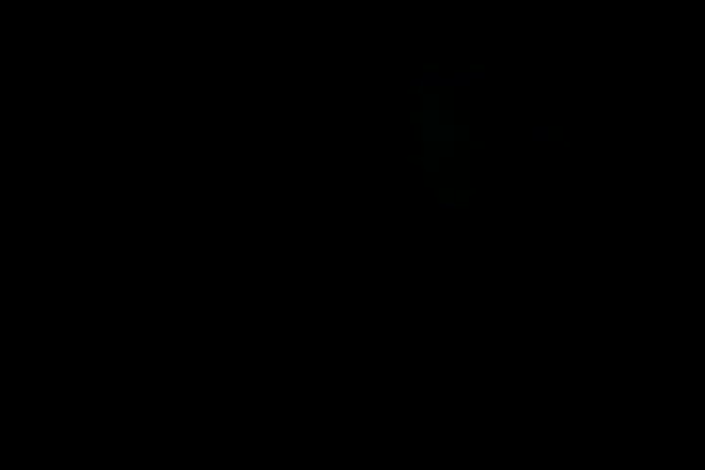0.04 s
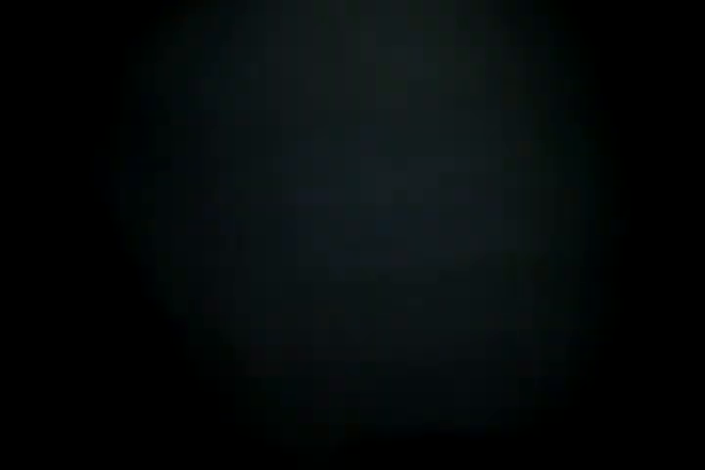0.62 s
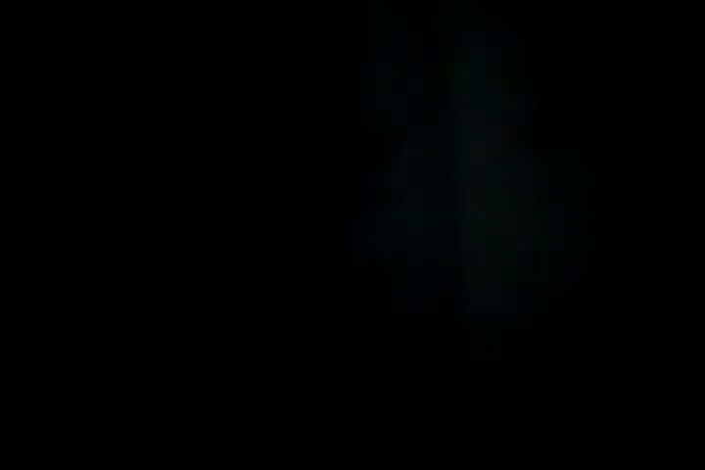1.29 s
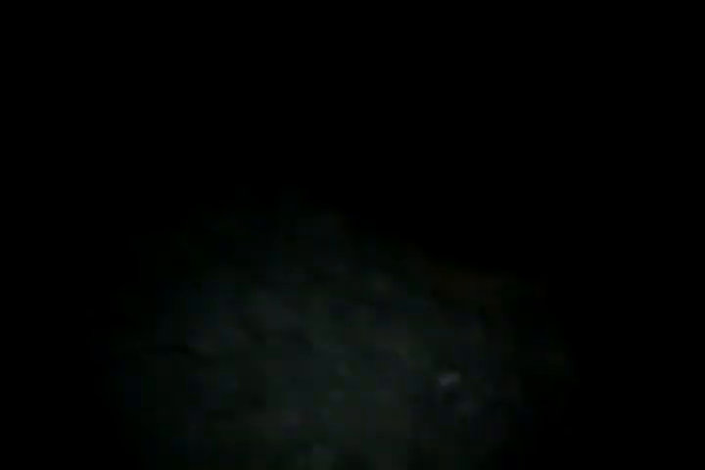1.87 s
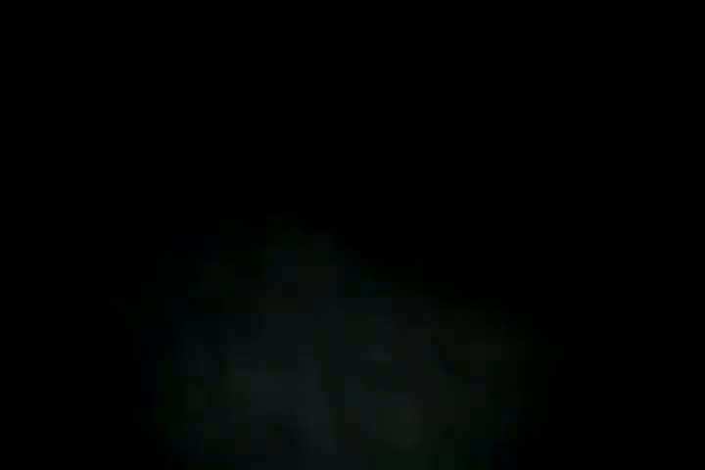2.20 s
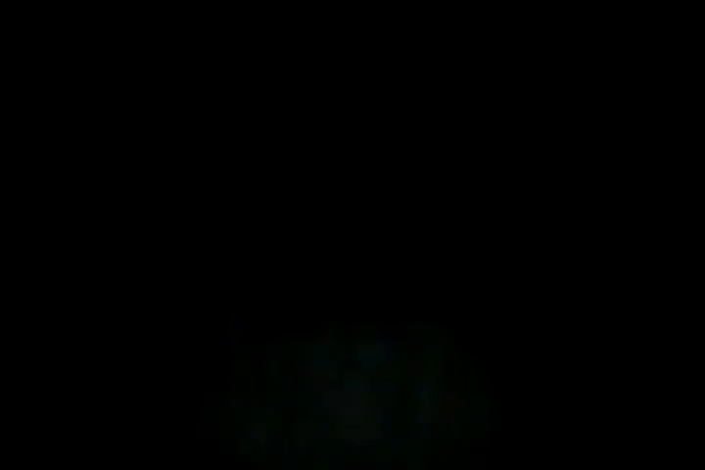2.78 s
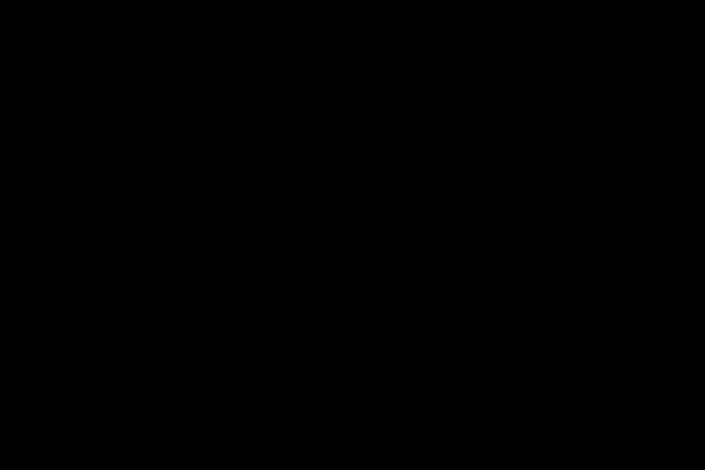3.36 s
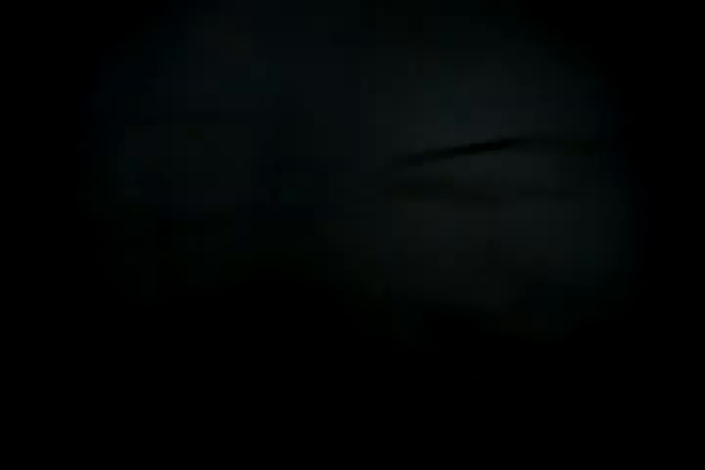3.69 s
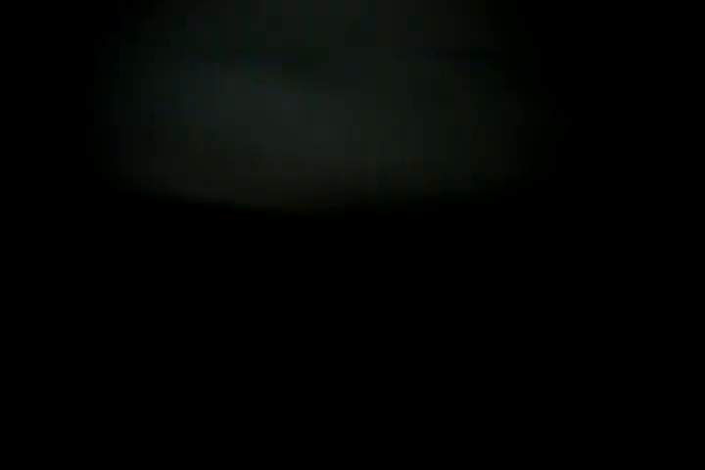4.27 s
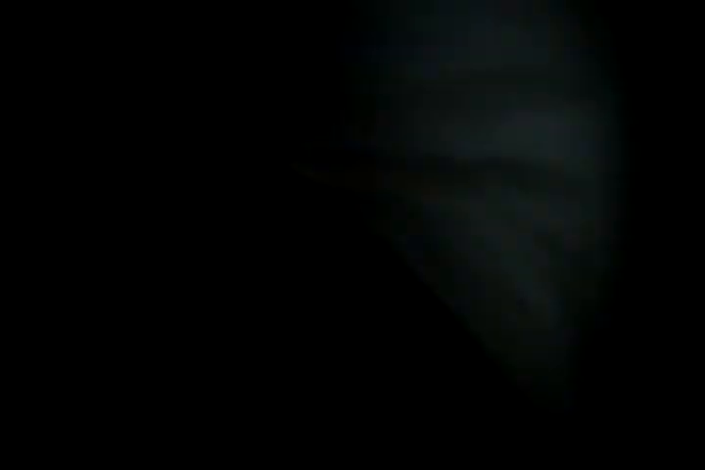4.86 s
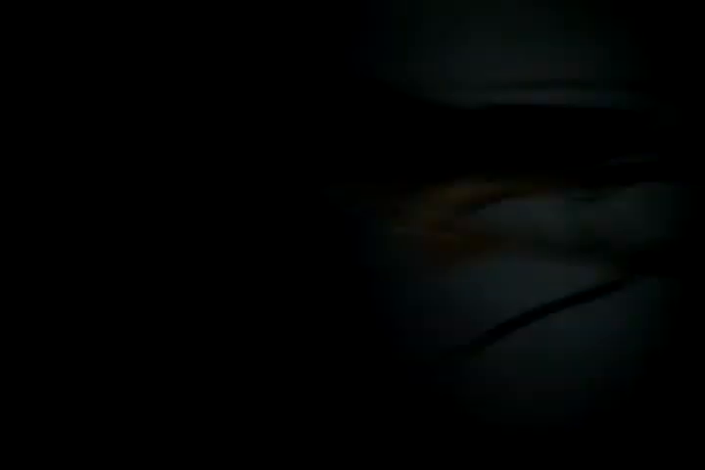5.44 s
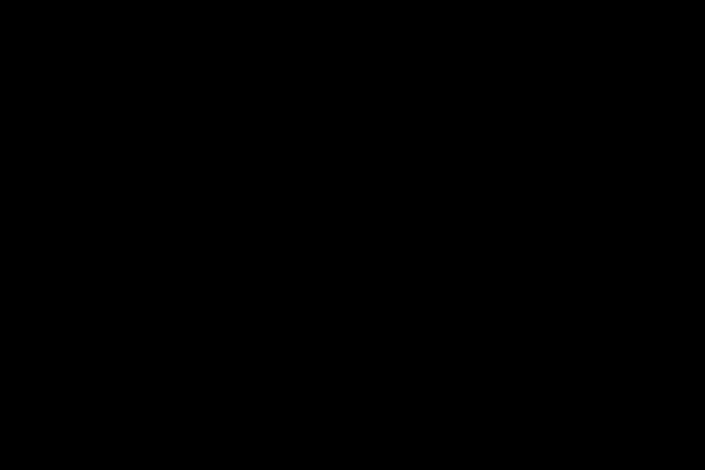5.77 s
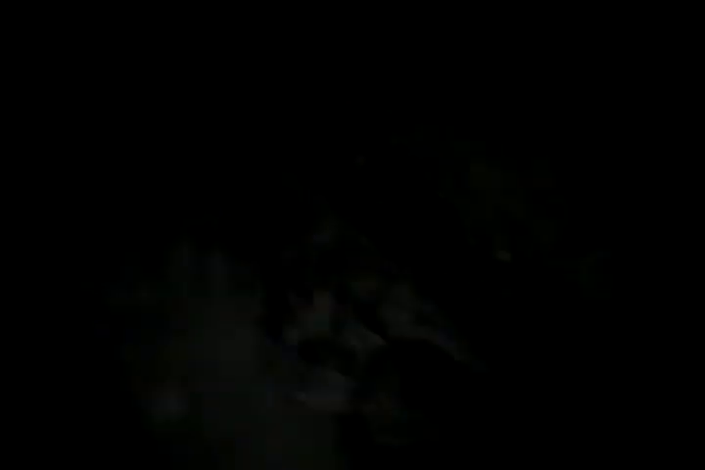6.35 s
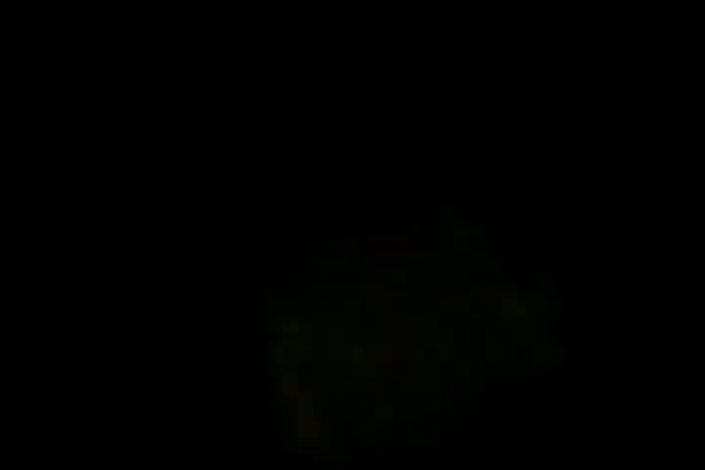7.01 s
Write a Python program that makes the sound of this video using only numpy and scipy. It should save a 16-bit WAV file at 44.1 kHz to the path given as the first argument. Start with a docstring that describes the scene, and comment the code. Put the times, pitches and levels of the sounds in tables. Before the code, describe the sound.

Slow, uneven footsteps crunch over rubble in a small concrete bunker, with cracking stones, scuffs and clinking shards.

```python
"""Slow steps over rubble in a small concrete bunker, heard by a hand-held camera.
Over a faint hiss, clothes rustle and the first light steps grind on grit. Within a second a stone
cracks, the hand bumps the camera, a sole scuffs and a loose shard clinks. From 2 to 3.5 seconds the
steps are heavy and many stones snap. Near 6 seconds come the loudest clink, the hardest bump and more
heavy steps, then the feet ease off. All along, the close walls answer with a short echo."""
import sys
import numpy as np
from scipy import signal
from scipy.fft import rfft, irfft, next_fast_len
from scipy.io import wavfile
from scipy.ndimage import map_coordinates

SR = 44100
rng = np.random.default_rng(int(sys.argv[2]) if len(sys.argv) > 2 else 0)


def digitize_waveform(pressure):
    """Quantize a signal to 16-bit integers and store it at the path in sys.argv[1].

    Rows of a 2-D input are taken as channels; values are limited to [-1, 1].
    """
    field = np.atleast_2d(pressure).T
    bounded = np.clip(field, -1, 1)
    quanta = np.round(bounded * 32767).astype(np.int16)
    wavfile.write(sys.argv[1], SR, quanta)


N = 318887


def amp(db):
    """Turn decibels into a number to multiply by."""
    return 10 ** (np.asarray(db) / 20)


def unit(x):
    """Scale x to an average (rms) level of 1."""
    return x / np.sqrt(np.mean(x ** 2) + 1e-20)


def along(points, hz):
    """Read between (Hz, value) points on a log frequency scale."""
    point_hz, values = np.transpose(points)
    return np.interp(np.log(hz + 1), np.log(point_hz + 1), values)


def add(track, start_s, sound):
    """Mix a sound into the track."""
    start = int(np.clip(round(start_s * SR), 0, N))
    track[start:start + len(sound)] += sound[:N - start]


def wobble(rate):
    """A smooth curve through `rate` random values a second."""
    return map_coordinates(rng.standard_normal(int(N * rate / SR) + 4), [np.arange(N) * rate / SR])


def coloured(x, gain_db):
    """Filter x by gain_db, a function that gives dB for each frequency."""
    size = 2 * next_fast_len(len(x) // 2 + 2048)
    cepstrum = irfft(np.log(amp(gain_db(np.fft.rfftfreq(size, 1 / SR))) + 1e-6), size)
    # make the filter ring after a click, never before it
    cepstrum[1:size // 2] *= 2
    cepstrum[size // 2 + 1:] = 0
    return irfft(rfft(x, size) * np.exp(rfft(cepstrum)), size)[:len(x)]


def shaped(x, tone):
    """Filter x by a table of (Hz, dB) points."""
    return coloured(x, lambda hz: along(tone, hz))


def hump(hz, centre_hz, width_hz):
    """Gain in dB of one broad resonance."""
    return -10 * np.log10(1 + (2 * (hz - centre_hz) / width_hz) ** 2)


def grains(length, rate, spread_db, rub):
    """Tiny breaks of uneven size, about `rate` a second, over smooth rubbing noise."""
    chance = rng.random(length)
    size, push, smooth = rng.standard_normal((3, length))
    clicks = (chance < rate / SR) * np.sign(push) * amp(spread_db * np.minimum(size, 2.5))
    return unit(unit(clicks) + rub * smooth)


# The tone of the hiss. Each row: frequency in Hz, gain in dB.
HISS_TONE = [(25, -4), (60, -6), (95, -28), (150, -24), (215, 1), (350, 2), (900, -2), (2500, -7),
             (5000, -9), (6800, -3), (7500, -7)]
def hiss():
    """The microphone's own faint, steady noise."""
    return amp(-55) * unit(shaped(rng.standard_normal(N), HISS_TONE))


# How the rustle rises and falls. Each row: time in seconds, relative level in dB.
RUSTLE_LEVELS = [(0.0, -61), (0.04, -82), (1.65, -64.5), (1.81, -50.5), (2.35, -50.5), (2.58, -52.5),
                 (3.14, -51.5), (3.56, -41), (3.79, -57), (3.9, -46.5), (5.84, -55), (6.24, -44.5),
                 (6.99, -59), (7.23, -54.5)]
# The tone of cloth. Each row: frequency in Hz, gain in dB.
CLOTH_TONE = [(30, -2.5), (65, -6), (100, -20), (150, -1.5), (270, -2), (450, -6), (800, -10.5),
              (3000, -39.5)]
def clothes():
    """Clothes rub with a low, uneven rustle."""
    level_db = np.interp(np.arange(N) / SR, *np.transpose(RUSTLE_LEVELS)) + 4.1 * wobble(14)
    rustle = unit(shaped(grains(N, rate=400, spread_db=1.5, rub=0.77), CLOTH_TONE))
    return rustle * amp(level_db - 2.5)


def pebbles(rate, pitch_hz, spread, t60, spread_db):
    """Small stones tap at random, each at its own pitch; t60 is the seconds to fade by 60 dB."""
    when, size, detune = rng.random((int(rate * N / SR), 3)).T[:, :, None]
    t = np.arange(SR // 80) / SR
    hz = pitch_hz * np.exp(spread * (2 * detune - 1))
    taps = amp(-spread_db * np.log(0.023 + size) - 60 * t / t60) * np.sin(2 * np.pi * hz * t)
    positions = (when * N).astype(int) + np.arange(len(t))
    return unit(np.bincount(positions.ravel(), taps.ravel(), N)[:N])


# The tones of grinding rubble and of its hollow ring. Each row: frequency in Hz, gain in dB.
GRIND_TONE = [(100, -43.5), (200, -7), (400, -2), (600, -0.5), (900, -2), (1250, 0.5), (1650, 0),
              (2050, -5), (2800, -5), (4500, -12.5), (7500, -32.5)]
HOLLOW_TONE = [(300, -38), (900, -16.5), (1300, -5.5), (1600, -2.5), (1850, -7), (2200, -11.5), (4000, -40)]
def grinding(breaks, coarse):
    """The low part of a step: rubble rubs and knocks, and rings hollow where it is coarse."""
    rubble = unit(shaped(breaks + grains(N, rate=1200, spread_db=3.5, rub=0.97), GRIND_TONE))
    knocks = pebbles(rate=150, pitch_hz=956, spread=0.8, t60=0.036, spread_db=4.0)
    hollow = unit(shaped(grains(N, rate=1200, spread_db=11.5, rub=0.65), HOLLOW_TONE))
    return unit(rubble + 0.5 * knocks + 0.81 * coarse * hollow)


# The tones of coarse gravel and fine sand. Each row: frequency in Hz, gain in dB.
GRAVEL_TONE = [(150, -54), (1500, -29), (2800, -15), (3800, -7), (4700, -7), (5400, -5.5), (6000, -0.5),
               (6900, -12.5), (7600, -24)]
SAND_TONE = [(150, -65.5), (1500, -26), (2800, -17.5), (3800, -12), (4700, -13), (5800, -6), (6600, 3.5),
             (7100, -6.5), (7600, -15)]
def grit(breaks, coarse):
    """The high part of a step: gravel and sand crackle while tiny stones tick."""
    gravel = unit(shaped(breaks + grains(N, rate=3800, spread_db=5.0, rub=0.18), GRAVEL_TONE))
    sand = unit(shaped(0.34 * breaks + grains(N, rate=1100, spread_db=4.5, rub=0.57), SAND_TONE))
    ticks = pebbles(rate=310, pitch_hz=5710, spread=0.26, t60=0.03, spread_db=3)
    return unit(np.sqrt(coarse) * gravel + np.sqrt(1 - coarse) * sand + 0.33 * ticks)


# A sole presses on the rubble. Each row: start of full pressure, hold and release in seconds,
# relative levels of grinding and grit in dB, coarseness from 0 (sand) to 1 (gravel).
PRESSES = [(0.177, 0.033, .09, -67, -56.5, 0), (0.681, 0.29, 0.12, -55, -50.5, 0),
           (0.917, .13, 0.076, -54, -44, 0.6), (1.491, 0.058, 0.34, -56.5, -51.5, 0),
           (1.757, 0.13, .15, -52.5, -46.5, 0), (1.937, 0.26, 0.18, -44.5, -38.5, 0.03),
           (2.095, 0.077, .25, -40.5, -37, 0.9), (2.521, 0.026, 0.064, -45, -44.5, 0.94),
           (2.735, .04, 0.13, -40.5, -34.5, 0.4), (2.946, 0.07, 0.07, -42.5, -37, 0.5),
           (3.11, 0.076, .15, -33.5, -32, 0.9), (3.269, 0.088, 0.22, -33.5, -37, 0.77),
           (3.526, 0.03, .14, -44, -46.5, 0.5), (3.89, 0.11, 0.15, -43.5, -38, 0),
           (4.232, 0.13, .25, -48, -39.5, 0), (4.448, 0.15, .1, -46.5, -47.5, 0),
           (4.616, 0.049, .25, -42, -35.5, 0.03), (4.98, .1, 0.26, -55.5, -49, 0.7),
           (5.303, 0.13, .1, -48, -44, .5), (5.415, .14, 0.17, -49.5, -36.5, 0.22),
           (5.74, 0.048, 0.12, -47, -43, .7), (5.953, 0.069, .12, -41, -33, 0.4),
           (6.127, 0.06, 0.14, -36, -27.5, 0.14), (6.324, 0.057, 0.2, -41, -33, 0.7),
           (6.5, .14, .2, -47, -39.5, 0.3), (6.701, 0.056, 0.65, -50, -45.5, 0.1),
           (7.152, 0.059, .15, -51, -44.5, .3)]
def footwork(swell_db=10.5, rest_db=-71.5):
    """Each press swells, holds and fades; gives grinding dB, grit dB and coarseness over time."""
    t = np.arange(N) / SR
    # the feet never stand quite still
    grind_power, grit_power, coarse_power = np.zeros((3, N)) + amp(rest_db) ** 2
    for start, hold, release, grind_db, grit_db, coarseness in PRESSES:
        attack = 0.52 * hold  # a long press also builds slowly
        away = np.maximum(start - t, 0) / attack + np.maximum(t - start - hold, 0) / release
        power = amp(-swell_db * np.minimum(away, 10)) ** 2
        grind_power += power * amp(grind_db) ** 2
        grit_power += power * amp(grit_db) ** 2
        coarse_power += power * amp(grit_db) ** 2 * np.clip(coarseness, 0, 1)
    coarse = np.clip(coarse_power / grit_power, 0, 1)
    return 10 * np.log10(grind_power), 10 * np.log10(grit_power), coarse


def steps(grind_db, grit_db, coarse):
    """Rubble crunches under the sole: the same tiny breaks knock low and crackle high."""
    breaks = grains(N, rate=300, spread_db=5.5, rub=0.42)
    low = grinding(breaks, coarse) * amp(grind_db + 0.46 * wobble(25))
    high = grit(breaks, coarse) * amp(grit_db + 1)
    slip_db = 1.55 * wobble(45)  # the sole catches and slips
    return (low + high) * amp(slip_db)


def fragment(hz, centre_hz, width_hz, bass_hz=1500):
    """Gain in dB of a bit of stone: it rings around one pitch and gives off little bass."""
    return 1.36 * hump(hz, centre_hz, width_hz) + 20 * np.log10((hz + 1) / (hz + bass_hz))


# The tone of a stone's dull knock. Each row: frequency in Hz, gain in dB.
KNOCK_TONE = [(60, -23.5), (200, -2.5), (550, 3.5), (1000, 1), (1600, 3), (2600, 0), (4000, -1),
              (7500, -45.5)]
# The larger stones that crack. Each row: start in seconds, relative level in dB, knock boost in dB,
# knock pitch in Hz, snap pitch in Hz, seconds to fade by 60 dB.
BIG_STONES = [(.186, -31.5, -18, 500, 6500, 0.0075), (.429, -33, -19, 400, 7000, 0.014),
              (.578, -22, -32, 500, 7000, 0.0046), (1.616, -26.5, -28, 430, 6500, 0.013),
              (1.739, -14, -31.5, 430, 6540, 0.022), (1.905, -19.5, -8, 590, 6300, .003),
              (2.082, -17, -31, 1370, 5300, .014), (2.094, -14, -13, 1100, 4530, 0.021),
              (2.134, -10, -25.5, 1300, 5280, 0.016), (2.208, -11, -18.5, 1200, 5730, .027),
              (2.354, -18, -15, 1170, 5000, .015), (2.677, -16, -28, 1230, 5050, 0.012),
              (2.722, -4, -17.5, 1270, 5350, 0.0089), (2.846, -11.5, -22, 1400, 5170, 0.0076),
              (2.858, -14, -20, 600, 6300, .009), (2.94, -17, -28, 500, 7100, .012),
              (3.098, -3.5, -20, 1600, 6220, 0.0062), (3.152, -9.5, -19, 600, 5800, 0.0053),
              (3.156, -3.5, -16.5, 900, 5800, 0.021), (3.273, -17.5, -5.5, 1300, 5550, 0.0029),
              (3.33, -14.5, -3, 1410, 5250, .014), (3.649, -8.5, -36, 1550, 6170, .004),
              (3.917, -18, -14, 650, 6500, 0.015), (3.966, -13, -22.5, 430, 6500, 0.011),
              (4.149, -10.5, -26, 420, 6200, 0.01), (4.445, -24, -9.5, 1110, 6400, .01),
              (4.504, -17, -24.5, 1400, 6450, .005), (4.55, -14.5, -27, 540, 6600, 0.0063),
              (4.62, -12.5, -20.5, 540, 6350, 0.017), (4.67, -14.5, -16.5, 400, 6370, 0.011),
              (5.421, -18, -15, 1970, 6400, 0.0035), (5.775, -30, -5, 1300, 6300, 0.022),
              (5.945, -12, -26, 1900, 6400, 0.0043), (5.994, -11, -15.5, 670, 6400, 0.032),
              (6.165, -7.5, -41, 600, 6560, .007), (6.384, -15.5, -16.5, 1700, 6240, 0.0063),
              (6.489, -12, -46, 650, 6100, .014), (6.62, -10, -18.5, 1900, 5900, .0035),
              (6.629, -9, -16, 1300, 5640, 0.019), (6.699, -15.5, -15, 1800, 5730, 0.011),
              (6.779, -18.5, -13, 1700, 6200, 0.0063), (7.138, -18, -19, 1800, 6400, 0.008),
              (7.193, -20, -12.5, 800, 6260, .005)]
def cracks(stones, crumble_db=-28, crumble_t60=0.11, rise_s=0.0024, rise_db=22):
    """A stone cracks with a very quick rise, a bright snap and a dull knock, then crumbles."""
    out = np.zeros(N)
    t = np.arange(SR // 12) / SR - rise_s
    after = np.maximum(t, 0)
    rise = amp(rise_db * np.minimum(t, 0) / rise_s)
    crumble = amp(crumble_db - 60 * after / crumble_t60)
    push = 2 * (np.arange(len(t)) == round(rise_s * SR))  # one sharp click as it breaks
    for start, db, knock_db, knock_hz, snap_hz, t60 in stones:
        fade = rise * (amp(-60 * after / max(t60, .001)) + crumble)
        high, low = rng.standard_normal((2, len(t))) * fade + push
        snap = coloured(high, lambda hz: fragment(hz, snap_hz, width_hz=1000))
        knock = coloured(low, lambda hz: along(KNOCK_TONE, hz) + hump(hz, knock_hz, width_hz=1500))
        add(out, start, amp(db - 27) * (unit(snap) + amp(knock_db + 13.5) * unit(knock)))
    return out


def small_stones(grit_db, per_second=8, knock_db=-21.5, knock_hz=600, snap_hz=6300, t60=0.0072):
    """Small stones break at random, louder as the sole presses harder; rows as in BIG_STONES."""
    when, size = rng.random((int(per_second * N / SR), 2)).T
    levels_db = grit_db[(when * N).astype(int)] + 17 + 7.5 * (2 * size - 1)
    return [(start, db, knock_db, knock_hz, snap_hz, t60) for start, db in zip(when * N / SR, levels_db)]


# Bumps on the camera. Each row: start in seconds, level in dB, pitch in Hz, seconds to fade by 60 dB.
HAND_BUMPS = [(.322, -34.5, 35, 0.26), (0.529, -44, 69, 0.18), (3.57, -54, 64, 0.195),
              (3.956, -39, 43.3, 0.26), (5.818, -20.5, 89, 0.047), (5.832, -42, 58, 0.27)]
def bumps(attack_s=0.0085):
    """The hand sends soft, low thuds through the camera body."""
    out = np.zeros(N)
    t = np.arange(SR // 2) / SR
    rise = 1 - np.exp(-t / attack_s)
    for start, db, hz, t60 in HAND_BUMPS:
        add(out, start, amp(db - 60 * t / t60) * np.sin(2 * np.pi * hz * t) * rise)
    return out


# Strokes of a sole. Each row: start and length in seconds, level in dB, strongest frequency in Hz.
STROKES = [(0.575, .025, -42, 7160), (1.749, .035, -41, 6700), (1.854, .021, -35.5, 5020),
           (1.912, .075, -27, 6520), (2.098, 0.052, -31.5, 5370), (2.515, 0.025, -31, 5650),
           (2.578, .055, -41.5, 4700), (2.727, .085, -32, 6000), (3.149, 0.011, -18.5, 5840),
           (3.327, 0.027, -34, 5950), (3.526, .068, -22.5, 6250), (3.663, .023, -39.5, 6430),
           (4.136, 0.039, -37.5, 5000), (4.653, .035, -31.5, 6500), (4.762, 0.05, -35, 6300),
           (5.211, .022, -39, 5450), (5.295, 0.044, -42, 5050), (5.421, .014, -33, 3030),
           (5.452, .022, -26, 6440), (5.465, .008, -30.5, 3800), (5.527, 0.021, -28.5, 6840),
           (5.733, .045, -33.5, 5960), (5.941, .022, -33.5, 6100), (6.17, .06, -28, 6300),
           (6.868, .033, -40.5, 6400)]
def scuffs(edge_s=.007, body_db=-18):
    """A quick stroke drags sand across the concrete: a bright burst over a dull body."""
    out = np.zeros(N)
    for start, length, db, bright_hz in STROKES:
        t = np.arange(int((length + edge_s) * SR)) / SR
        scrape = grains(len(t), rate=3500, spread_db=2, rub=0.53)
        sand = coloured(scrape, lambda hz: fragment(hz, bright_hz, width_hz=1500))
        body = shaped(grains(len(t), rate=1500, spread_db=3, rub=0.54), KNOCK_TONE)
        fade = np.clip(np.minimum(t, t[-1] - t) / edge_s, 0, 1)
        add(out, start, amp(db) * fade * (unit(sand) + amp(body_db) * unit(body)))
    return out


# The notes of each shard. Each row: pitch in Hz, relative level in dB, seconds to fade by 60 dB.
SHARD_NOTES = {"small": [(4533, -1, .3), (5330, -3, .22), (5986, -3, .2), (6595, 0, .18)],
               "large": [(3413, -5, .22), (4215, -1, .28), (4414, 0, .32), (5378, -6, .25),
               (5916, -1, .28)], "thin": [(2935, -5, .35), (4620, 1, .22), (5250, -8, .18), (6546, 0, .36),
               (6640, -3, .2)]}
# Hits on loose shards. Each row: start in seconds, level in dB, favoured pitch in Hz, which shard.
SHARD_HITS = [(.678, -47, 5800, "small"), (1.585, -48, 5300, "small"), (1.62, -40, 5400, "small"),
              (1.86, -37, 5200, "small"), (1.995, -32, 5100, "small"), (2.095, -35, 4800, "small"),
              (3.331, -24.5, 4800, "large"), (4.15, -35, 5800, "thin"), (5.468, -29, 4300, "thin"),
              (5.522, -18.5, 6800, "thin"), (6.02, -39, 4300, "large")]
def clinks(attack_s=.003, scatter_db=1.2, rattle=.055):
    """A struck shard rings with a new mix of its notes each time, chattering against the floor."""
    out = np.zeros(N)
    t = np.arange(SR // 2) / SR
    rise = 1 - np.exp(-t / attack_s)
    for start, db, favoured_hz, shard in SHARD_HITS:
        hz, note_db, t60 = np.transpose(SHARD_NOTES[shard])[:, :, None]
        hit_db = hump(hz, favoured_hz, width_hz=1500) + rng.normal(0, scatter_db, hz.shape)
        strength = amp(note_db + hit_db)
        chatter = rattle * np.cumsum(rng.standard_normal((len(hz), len(t))), axis=1)
        ring = strength * amp(-60 * t / t60) * np.sin(2 * np.pi * hz * t + chatter)
        add(out, start, amp(db) * ring.sum(axis=0) / np.linalg.norm(strength) * rise)
    return out


# How long the echo lasts. Each row: frequency in Hz, seconds to fade by 60 dB.
ECHO_TIMES = [(150, 0.27), (1500, 0.25), (7000, 0.097)]
def walls(sound, delay_s=0.0064):
    """Close concrete walls answer with a short echo, the treble dying first."""
    hz, t, noise = signal.stft(rng.standard_normal(SR // 2), SR, nperseg=256)
    fade = amp(-60 * t / along(ECHO_TIMES, hz)[:, None])
    _, tail = signal.istft(noise * fade, SR, nperseg=256)
    echo = np.pad(tail / np.linalg.norm(tail), (int(delay_s * SR), 0))
    return signal.fftconvolve(sound, echo)[:N]


def scene():
    """The walker's sounds and their echo, with the camera's bumps and hiss."""
    grind_db, grit_db, coarse = footwork()
    walker = clothes() + steps(grind_db, grit_db, coarse) + scuffs()
    walker += cracks(BIG_STONES + small_stones(grit_db)) + clinks()
    return (walker + amp(-12) * walls(walker) + bumps() + hiss())[None]


# How the microphone dulls the treble. Each row: frequency in Hz, gain in dB.
MICROPHONE_TONE = [(6800, 0), (7100, -3), (7450, -11), (7700, -23), (8000, -42), (8350, -25), (8800, -23),
                   (9200, -35)]
def record(dry, top_hz=9200, offset=-.0126):
    """The camera loses the top treble, and its wave sits slightly below zero."""
    sound = shaped(dry[0], MICROPHONE_TONE)
    passed = np.fft.rfftfreq(N, 1 / SR) < top_hz
    return irfft(rfft(sound) * passed, N)[None] + offset


dry = scene()
out = record(dry)
digitize_waveform(out)
```